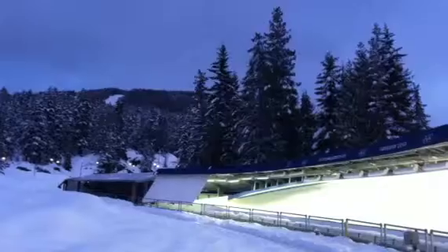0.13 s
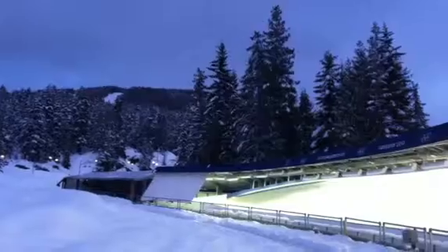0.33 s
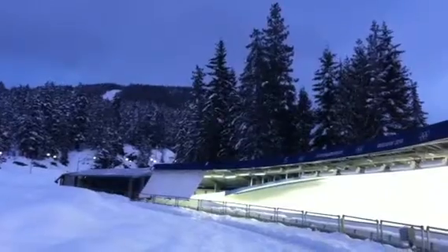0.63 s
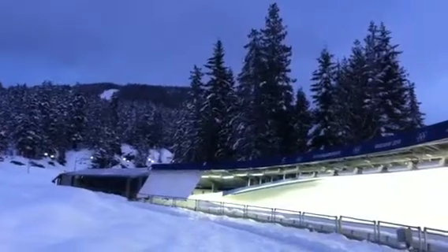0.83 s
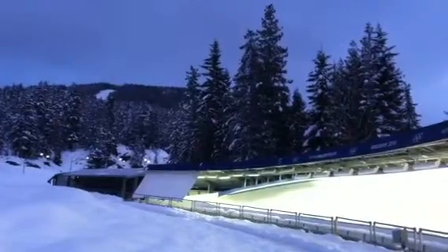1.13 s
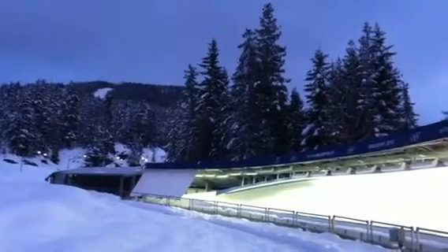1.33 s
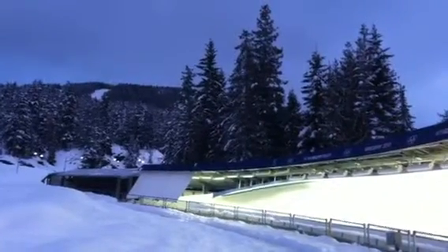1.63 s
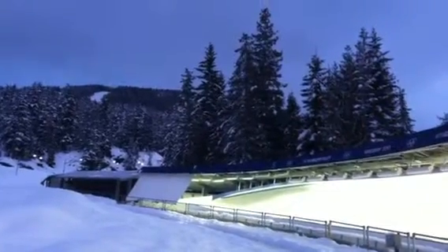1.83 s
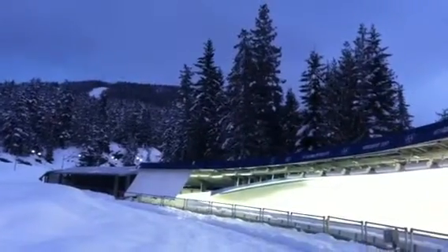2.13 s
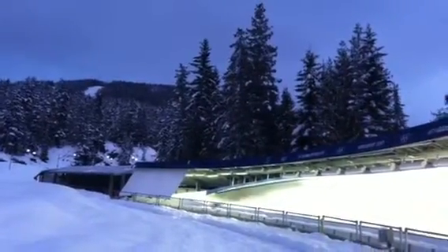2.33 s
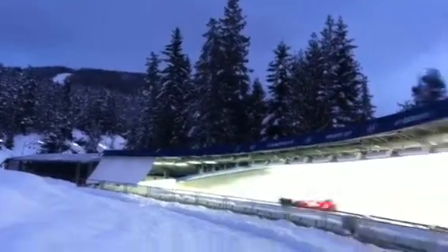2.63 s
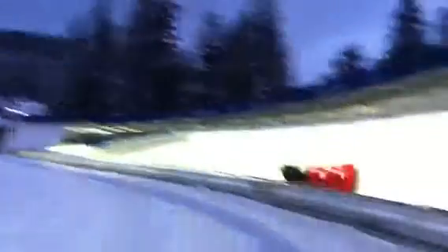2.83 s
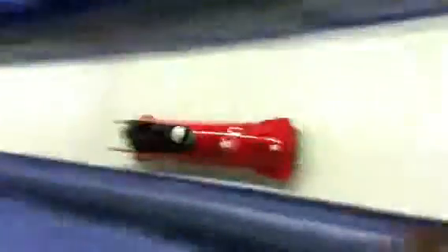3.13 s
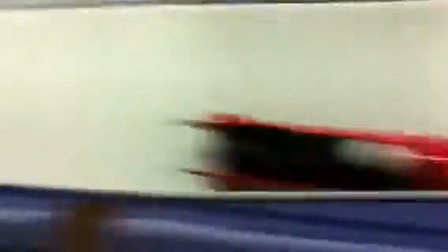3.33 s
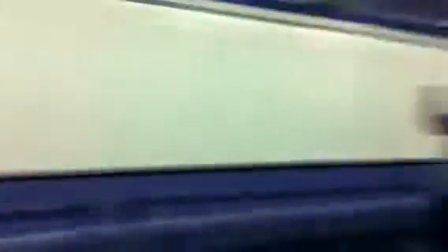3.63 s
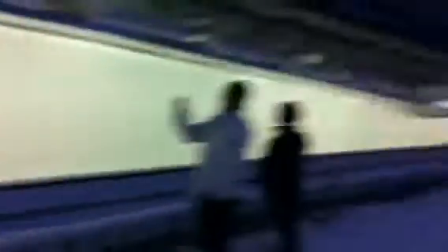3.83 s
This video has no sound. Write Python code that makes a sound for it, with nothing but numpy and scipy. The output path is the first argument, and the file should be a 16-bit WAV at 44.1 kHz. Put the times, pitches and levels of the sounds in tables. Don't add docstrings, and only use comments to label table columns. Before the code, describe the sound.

Bobsled approaching on ice: low rumble grows, then roars past with knocks, scraping and hissing.

```python
import sys
import numpy as np
from scipy import signal
from scipy.io import wavfile
from scipy.ndimage import uniform_filter1d

SR = 44100
rng = np.random.default_rng(int(sys.argv[2]) if len(sys.argv) > 2 else 0)


def invert_db(x):
    u = np.asarray(x, float) / 20
    return 10 ** u


def to_wav(s):
    ch = np.atleast_2d(s).T
    pcm = np.round(np.clip(ch, -1, 1) * 32767)
    wavfile.write(sys.argv[1], SR, pcm.astype(np.int16))


N = 176400

SPEED_M_S, PASS_S, NEAREST_M, SOUND_M_S = 24.7, 3.4, 9.1, 325
AIR_DB_PER_M, AIR_SLOPE = 0.77, 1.46


def place(t):
    along = SPEED_M_S * (t - PASS_S)
    metres = np.hypot(NEAREST_M, along)
    return metres, 1 / (1 + SPEED_M_S * along / metres / SOUND_M_S)


def evened(x):
    return x / np.sqrt(np.mean(x ** 2) + 1e-20)


def smooth(shape, *passes):
    x = rng.standard_normal(shape)
    for size, axis in passes:
        x = uniform_filter1d(x, size=size, axis=axis)
    return evened(x)


def read(points, hz):
    f, value = np.transpose(points)
    return np.interp(np.log(hz + 1), np.log(f + 1), value, left=-120, right=value[-1])


def resonate(x, hz, width):
    turn = np.exp(2j * np.pi * np.cumsum(hz * np.ones(len(x))) / SR)
    r = np.exp(-np.pi * width / SR)
    return 2 * (turn * signal.lfilter([1 - r], [1, -r], x / turn)).real


def twice(x, hz, width, second_width):
    return evened(resonate(resonate(x, hz, width), hz, second_width))


def grit(per_s, spread_db):
    size = invert_db(spread_db * np.minimum(rng.exponential(1, N), 5)) * rng.standard_normal(N)
    return evened(size * (rng.random(N) < per_s / SR))


def colour(x, shape, patchy_db, flicker_db, far=0, moved=0):
    hz, t, z = signal.stft(x, SR, nperseg=1024, noverlap=768)
    patches = smooth(z.shape, (12, 0), (12, 1))
    streaks = smooth(z.shape, (2, 0), (14, 1))
    flicker = smooth(len(t), (5, 0))
    metres, shift = place(t)
    db = read(shape, hz[:, None] / shift ** moved)
    db = db + patchy_db * (patches + 0.71 * streaks) + flicker_db * flicker
    db = db - 10 * np.log10(np.mean(invert_db(2 * read(shape, hz))))
    absorption = AIR_DB_PER_M * (hz[:, None] / 14300.0) ** AIR_SLOPE
    db = db - far * absorption * (metres - NEAREST_M)
    return signal.istft(z * invert_db(db), SR, nperseg=1024, noverlap=768)[1][:N]


# pitch_hz [Hz], level_db [dB per Hz]
HISS_SPECTRUM = [(1470, -17), (2500, -6.5), (3890, -8.5), (5790, -8.5), (6800, -11), (15500, -12)]


def microphone_hiss():
    return invert_db(-70) * colour(rng.standard_normal(N), [(1500, -40)] + HISS_SPECTRUM, 0.17, .3)


# pitch_hz [Hz], level_db [dB per Hz]
SPRAY_SPECTRUM = [(3000, -13), (3800, -1), (5000, 2.5), (6600, -3), (7600, -6.5), (8600, -2), (12300, -2.5),
                  (14500, -7)]
# start_s [s], level_db [dB]
SHAVED_ICE = [(.12, -6), (1.72, 2), (1.76, 4), (2.15, 1), (2.6, 1.5), (2.85, -2.5), (3.0, 4.5),
              (3.13, -0.5), (3.3, 2.5), (3.45, 1.5), (3.65, 1), (4.0, 1.5)]
SPRAY_DB = -21.5


def spray():
    shaved_db = np.interp(np.arange(N) / SR, *np.transpose(SHAVED_ICE))
    hiss = colour(grit(30000, 1.0), [(2000, -60)] + SPRAY_SPECTRUM, 1.12, 0.6, far=1, moved=0.83)
    return invert_db(SPRAY_DB + shaved_db) * hiss


# pitch_hz [Hz], level_db [dB per Hz]
SCRAPE_SPECTRUM = [(400, -3.5), (580, -5.5), (1000, -7), (1400, -9.5), (2000, -11.5), (2600, -16),
                   (3200, -24.5), (4300, -39)]
# pitch_hz [Hz], width_hz [Hz], level_db [dB]
RUNNER_MODES = [(564.6, 10.6, -19), (796, 66, -23), (883, 32, -23.5), (1210, 8.7, -41), (1610, 70, -27),
                (1767, 51, -35), (2507, 13, -36)]
SCRAPE_DB, SING_HZ, SING_WIDTH_HZ, SING_DB = -8.5, 2100, 600, -6


def runners(sing_db):
    slips = grit(16000, 0.96)
    sing = twice(slips, SING_HZ, SING_WIDTH_HZ, SING_WIDTH_HZ)
    rings = sum(invert_db(db) * twice(slips, f, w, 4 * w) for f, w, db in RUNNER_MODES)
    spectrum = [(250, -55)] + SCRAPE_SPECTRUM + [(6000, -88)]
    scrape = colour(slips, spectrum, 1.09, 0.73, far=0.63, moved=0.75)
    waver_db = 5.0 * smooth(N, (1500, 0))
    return invert_db(SCRAPE_DB) * (scrape + rings + invert_db(SING_DB + sing_db + waver_db) * sing)


# start_s [s], level_db [dB of extra load], length_s [s]
JOINTS = [(0.24, 2.5, .05), (1.057, 6, 0.026), (1.467, 5, 0.2), (1.75, 5, 0.12), (2.21, 6, 0.049),
          (2.256, 1.5, 0.046), (2.427, 4, 0.025), (2.523, 4, .07), (2.667, -0.5, .04), (2.802, 1, 0.06),
          (2.845, 3, 0.042), (2.92, 4, 0.015), (3.029, 5.5, 0.011), (3.117, 0, 0.066), (3.178, -5, 0.012),
          (3.23, -1.5, 0.05), (3.409, 3, 0.055), (3.469, 5.5, 0.033), (3.535, 7.5, 0.011),
          (3.59, 3.5, 0.026), (3.83, 3.5, 0.043)]


def jolts(rise_s):
    t, lift = np.arange(N) / SR, np.zeros(N)
    for s, lift_db, length in JOINTS:
        u = np.maximum(t - s, 0)
        lift += lift_db * (1 - np.exp(-u / rise_s)) * np.exp(-u / max(length, .005))
    return lift


RING_RISE, RING_SAG = 2.9, 0.024


def rung(rows, trim_db):
    out, phase = np.zeros(N), rng.random((len(rows), 1))
    for (s, db, hz, length), (p,) in zip(rows, phase):
        u = np.arange(0, 4 * length, 1 / SR) / (0.62 * length)
        turns = np.cumsum(hz * (1 + RING_SAG * (1 - u))) / SR + p
        swell = (u * np.exp(1 - u)) ** RING_RISE
        ring = invert_db(db + trim_db) * swell * np.sin(2 * np.pi * turns)
        part = out[round((s - 0.7 * length) * SR):][:len(u)]
        part += ring[:len(part)]
    return out


# middle_s [s], peak_db [dB],
# pitch_hz [Hz], length_s [s]
PANEL_PINGS = [(1.76, -53, 1889.0, 0.028), (1.772, -53.9, 2140, 0.035), (1.89, -46, 541, 0.052),
               (2.273, -41, 558, 0.056), (2.361, -38.5, 527, 0.045), (2.446, -46, 2121.0, 0.027),
               (2.732, -35, 1641.0, 0.036), (2.852, -34.5, 1405.0, 0.044), (2.863, -45, 605, 0.028),
               (2.865, -51, 2115.0, 0.036), (2.871, -31, 562, 0.037), (3.167, -35, 1862.0, 0.034),
               (3.179, -28, 757, 0.025), (3.219, -28, 568, 0.057), (3.34, -25, 620, 0.057),
               (3.428, -34.6, 2099.0, 0.059), (3.484, -33, 532.0, 0.032), (3.49, -28, 1810, 0.032),
               (3.504, -30, 1889.0, 0.028), (3.542, -34.6, 1960, 0.048), (3.542, -26.5, 1744.0, 0.03),
               (3.542, -33, 486, 0.06), (3.554, -21, 593, 0.029), (3.785, -28.5, 501, 0.049),
               (3.805, -27, 786, 0.038), (3.815, -25, 578, 0.032), (3.889, -27.5, 610, 0.038),
               (3.905, -33, 1730, 0.03), (3.929, -26, 590, 0.03),
               (.25, -51, 482, .06),
    (0.333, -53, 780, .06),
    (2.678, -44, 1048, .04),
    (2.9, -38, 1190, 0.035),
    (3.112, -36, 994, .03),
    (3.46, -29, 953, 0.047),
    (3.603, -28, 682, 0.035),
    (3.658, -27, 575, .12),
    (3.73, -32.5, 780, .09),
    (3.848, -33, 723, .04),
]


def panel_rings():
    return rung(PANEL_PINGS, -2)


# middle_s [s], peak_db [dB], pitch_hz [Hz], length_s [s]
RIDGES = [(0.279, -49, 193.0, 0.045), (0.327, -45, 232, 0.028), (0.357, -45, 193, 0.069),
          (0.403, -46, 355.0, 0.039), (0.563, -47, 200, 0.038), (0.8, -53, 315, 0.032),
          (0.858, -44, 182, 0.053), (1.115, -44.5, 291, 0.024), (1.309, -46, 200, 0.033),
          (1.431, -43.5, 253, 0.04), (1.568, -44.8, 200, 0.052), (1.812, -43, 226.0, 0.055),
          (1.991, -37.5, 174, 0.042), (2.217, -29, 187, 0.034), (2.319, -28, 179, 0.024),
          (2.361, -31, 311, 0.03), (2.444, -26.0, 169.8, 0.046), (2.468, -30, 219, 0.072),
          (2.472, -36, 350, 0.041), (2.74, -27.5, 203, 0.039), (2.802, -27.5, 249.3, 0.052),
          (2.854, -29, 184, 0.022), (2.943, -23, 326, 0.03), (3.041, -21.5, 303, 0.027),
          (3.115, -20, 245, 0.026), (3.219, -17, 228.5, 0.026), (3.261, -14.5, 197.6, 0.0299),
          (3.293, -17.3, 199, 0.022), (3.35, -18, 228, 0.061), (3.416, -16, 220.9, 0.061),
          (3.512, -12, 164.5, 0.038), (3.538, -13, 332, 0.027), (3.55, -15, 232.7, 0.043),
          (3.616, -14.5, 220.3, 0.0316), (3.666, -15.5, 209.6, 0.059), (3.743, -19, 199.0, 0.048),
          (3.809, -17, 169, 0.026), (3.813, -18.5, 253.2, 0.066), (3.873, -20, 178.4, 0.089),
          (3.917, -20.5, 288, 0.024)]


def hull_knocks():
    return rung(RIDGES, -1)


# pitch_hz [Hz], width_hz [Hz], level_db [dB]
HULL_MODES = [(141.5, 17, -18), (172.3, 28.5, -2), (229.8, 32.7, 0), (294.3, 50, -2), (345.6, 62, -2),
              (411, 115, -7.5), (550, 93, -23)]
# pitch_hz [Hz], level_db [dB per Hz]
THUD_SPECTRUM = [(30, -49), (60, -11.5), (110, -20), (165, 1.5), (220, -1.5), (440, -14.5), (750, -15.5)]
BUMPS_PER_S, BUMP_SPREAD_DB = 1200, 2
THUD_DB, THUD_LOSS_DB_PER_M = -2.5, 0.03
HULL_SHIFT, RUMBLE_EVEN = 0.96, 0.35


def rumble():
    metres, shift = place(np.arange(N) / SR)
    shift = shift ** HULL_SHIFT
    bumps = grit(BUMPS_PER_S, BUMP_SPREAD_DB) + 0.66 * rng.standard_normal(N)
    modes = np.zeros(N)
    for k, (f, w, db) in enumerate(HULL_MODES):
        modes += (-1) ** k * invert_db(db) * twice(bumps, f * shift, 1.42 * w, 1.42 * w)
    thud = colour(rng.standard_normal(N), THUD_SPECTRUM + [(1100, -57)], 0.91, 0.96)
    body = evened(modes) + invert_db(THUD_DB - THUD_LOSS_DB_PER_M * metres) * thud
    swing = uniform_filter1d(uniform_filter1d(body ** 2, size=700), size=700) + .05
    return evened(body / swing ** (RUMBLE_EVEN / 2))


# start_s [s], rumble_db [dB], runner_load_db [dB], runner_singing_db [dB]
RIDE_LEVELS = [(.12, -50, -1.5, -22), (.33, -46, 0, -23), (.68, -52.5, 1.5, -9), (.87, -48.5, -1.5, -17),
               (1.05, -48, -2.5, -8.5), (1.69, -48.5, 3, -10), (1.77, -48, 3, 2.5), (1.95, -46.5, 3.5, -3),
               (2.18, -39, 1.5, -30), (2.45, -33.5, 2.5, -1.5), (2.6, -34, 4, -29), (2.86, -25.5, 1, -17),
               (3.01, -29, 0, -21), (3.17, -22, 0.5, -24), (3.53, -17, -1, -25), (3.73, -23.5, 1, -12),
               (3.86, -22, -1, -7), (4.0, -28, 4.5, -22)]


def scene():
    s, *controls = np.transpose(RIDE_LEVELS)
    level, load, sing = (np.interp(np.arange(N) / SR, s, c) for c in controls)
    jolt = jolts(0.0042)
    hull = invert_db(0.49 * jolt - 1.0) * rumble()
    ice = invert_db(0.82 * jolt) * runners(sing) + invert_db(jolt) * spray()
    sled = invert_db(level) * (hull + invert_db(load) * ice)
    return (sled + hull_knocks() + panel_rings() + microphone_hiss())[None]


# pitch_hz [Hz], threshold [share of the mean amplitude of the bands around]
LOST_LINES = [(1900, .03), (2600, .08), (3400, .2), (5700, .34), (6900, .46), (12000, .58), (15800, .66)]
# pitch_hz [Hz], level_db [dB]
LOST_BANDS = [(5200, -6), (6900, -4.6), (7400, -2.6), (8100, -3.9), (12500, -3.7), (13500, -2.3),
              (15300, -2.5)]
GRID, HOP = 127, 1024
STARVED_DB, RICH_DB, RICH_SPARE_DB = -50, -25, -1.3


def starve(x):
    n, k = np.arange(2 * HOP) + .5, np.arange(HOP) + .5
    window = np.sin(np.pi * n / (2 * HOP))[:, None]
    basis = window * np.cos(np.pi / HOP * np.outer(n + HOP / 2, k)) * np.sqrt(2 / HOP)
    frames, hz = N // HOP + 2, k * SR / (2 * HOP)
    padded = np.pad(x[0], (HOP - GRID, (frames + 1) * HOP))
    hops = padded[:(frames + 1) * HOP].reshape(-1, HOP)
    lines = np.hstack([hops[:-1], hops[1:]]) @ basis
    band = uniform_filter1d((lines ** 2).reshape(frames, -1, 16).mean(2), size=2, axis=0) + 1e-20
    around = np.exp(uniform_filter1d(np.log(band), size=9, axis=1))
    power = band.mean(1, keepdims=True)
    limit_db = read(LOST_BANDS, hz[::16]) + RICH_SPARE_DB * (power > invert_db(2 * RICH_DB))
    hole = (band < around * invert_db(2 * limit_db)) & (power > invert_db(2 * STARVED_DB))
    threshold = np.interp(hz, *np.transpose(LOST_LINES))
    strong = lines ** 2 > np.repeat(around, 16, axis=1) * threshold ** 2
    parts = (lines * strong * ~np.repeat(hole, 16, axis=1)) @ basis.T
    joined = np.pad(parts[:, :HOP], ((0, 1), (0, 0))) + np.pad(parts[:, HOP:], ((1, 0), (0, 0)))
    return joined.ravel()[HOP - GRID:][:N][None]


def band_limit(x):
    return signal.sosfilt(signal.butter(12, 15850, fs=SR, output="sos"), x)


LOW_CUT_HZ, CEILING, OPEN_S, OPEN_RISE_S = 70, 1, .1185, .003


def record(dry):
    t = np.arange(N) / SR
    cut = signal.sosfilt(signal.butter(2, LOW_CUT_HZ, "high", fs=SR, output="sos"), dry)
    soft = CEILING * np.tanh(cut / CEILING)
    opening = np.clip((t - OPEN_S) / OPEN_RISE_S, 0, 1)
    mix = starve(soft) * opening
    return band_limit(mix)


dry = scene()
out = record(dry)
to_wav(out)
```